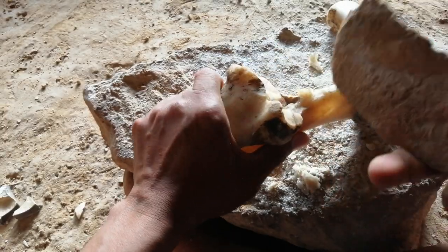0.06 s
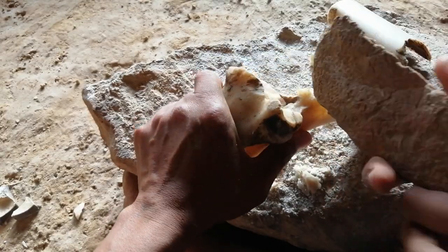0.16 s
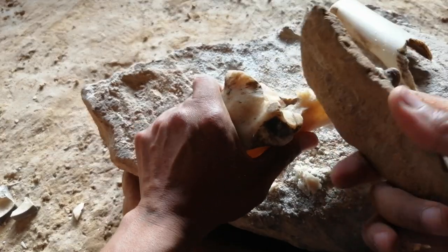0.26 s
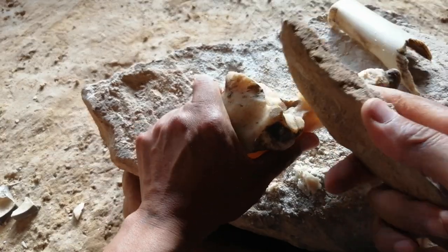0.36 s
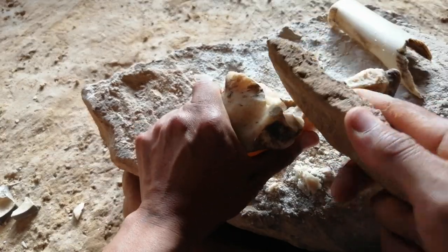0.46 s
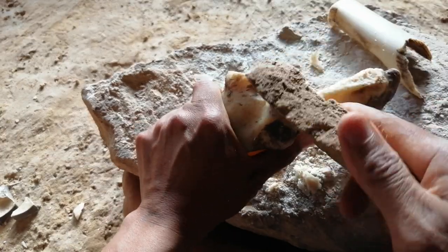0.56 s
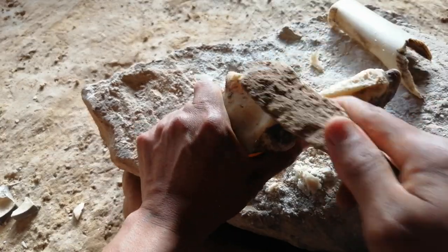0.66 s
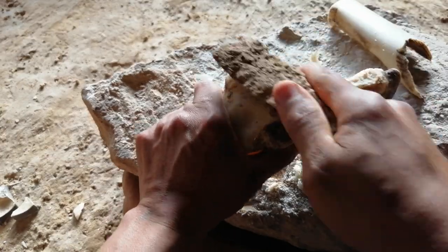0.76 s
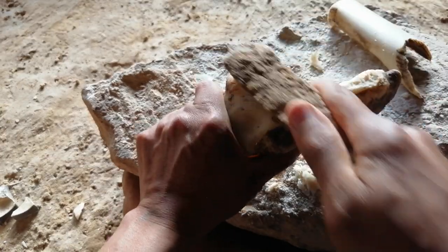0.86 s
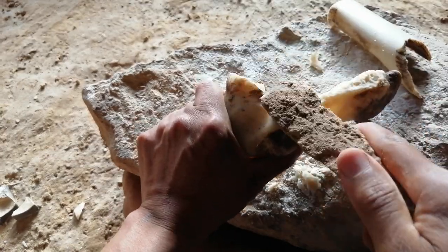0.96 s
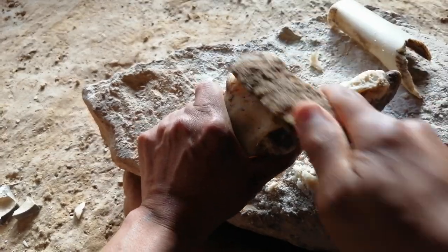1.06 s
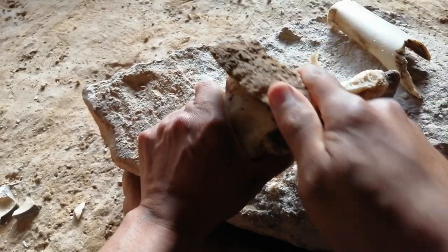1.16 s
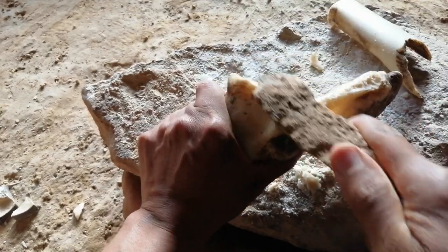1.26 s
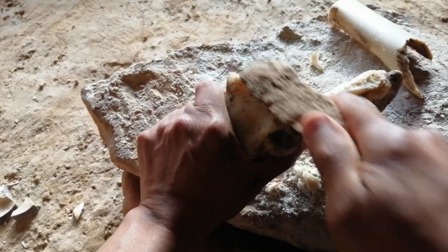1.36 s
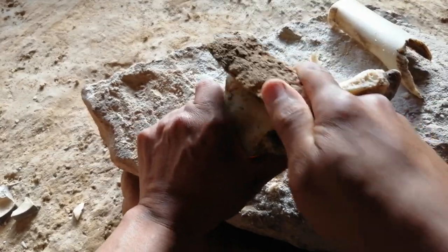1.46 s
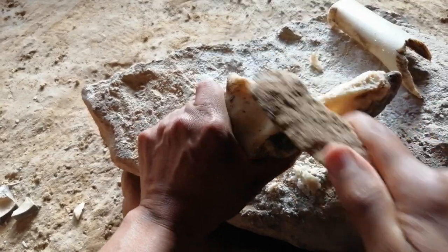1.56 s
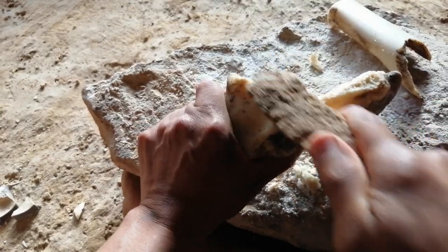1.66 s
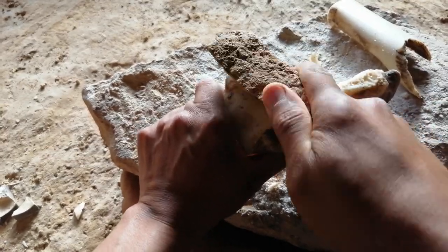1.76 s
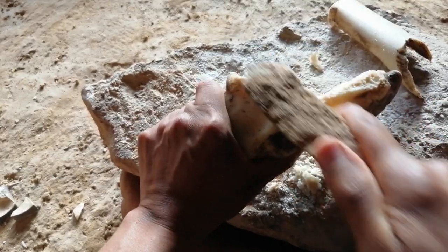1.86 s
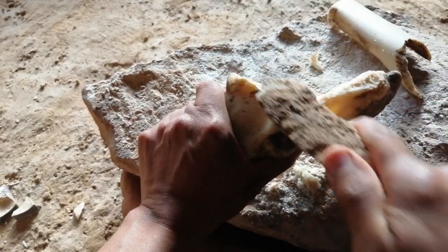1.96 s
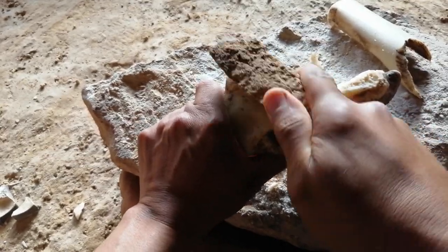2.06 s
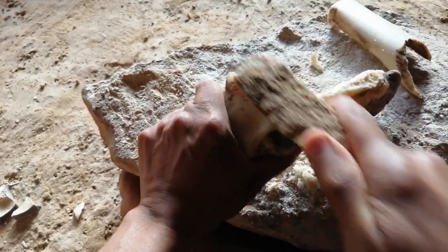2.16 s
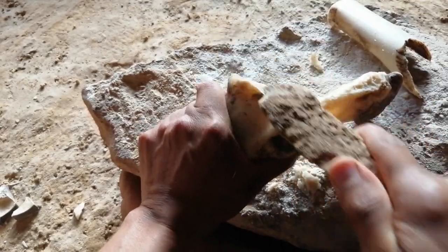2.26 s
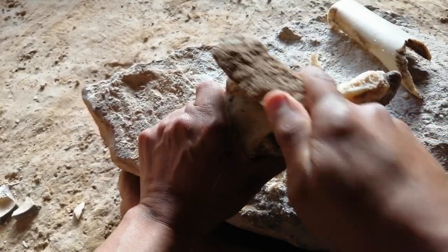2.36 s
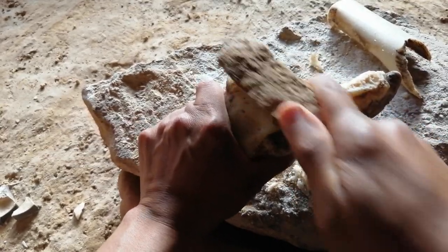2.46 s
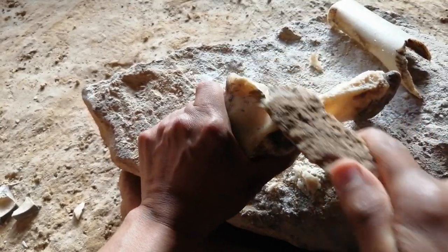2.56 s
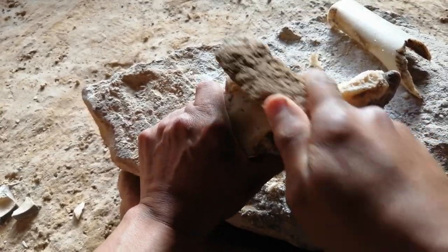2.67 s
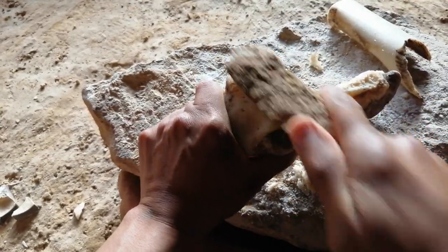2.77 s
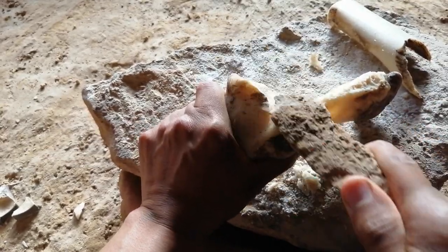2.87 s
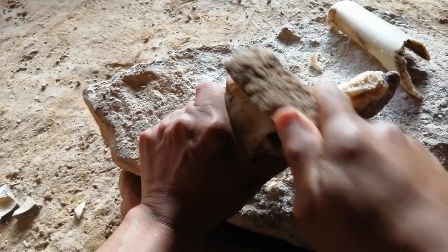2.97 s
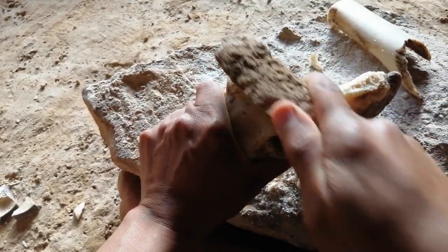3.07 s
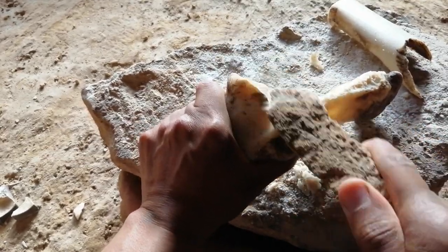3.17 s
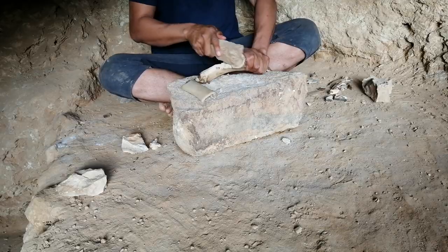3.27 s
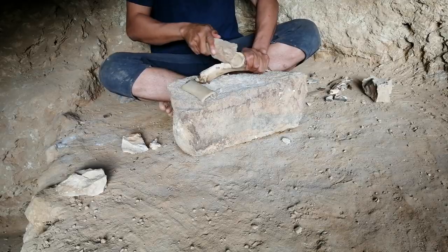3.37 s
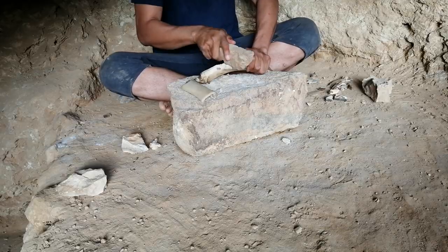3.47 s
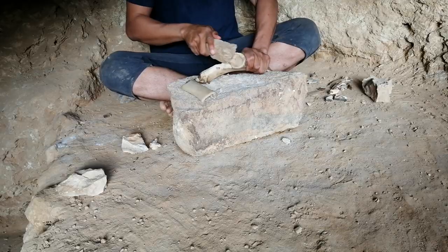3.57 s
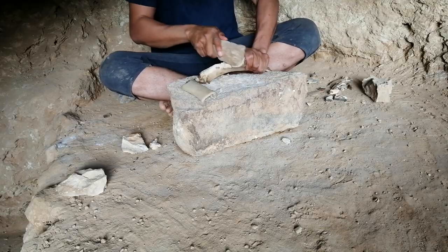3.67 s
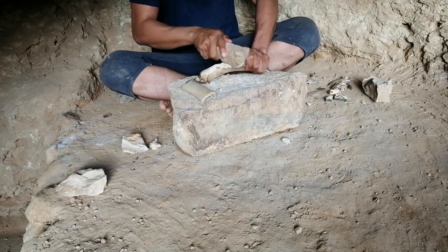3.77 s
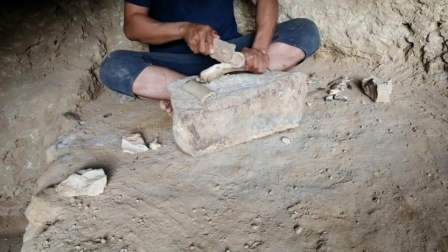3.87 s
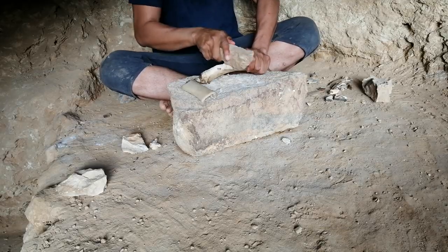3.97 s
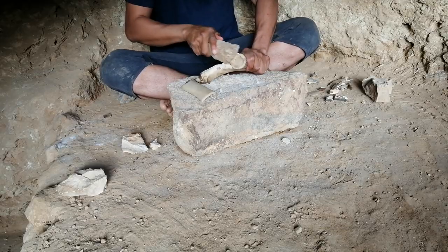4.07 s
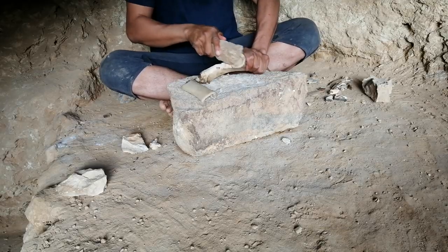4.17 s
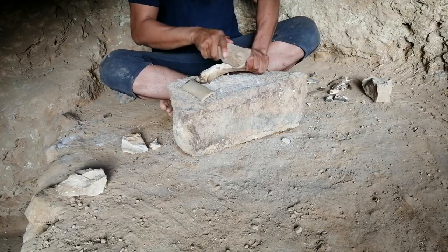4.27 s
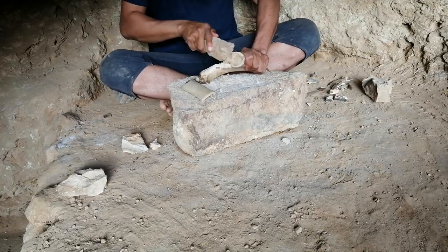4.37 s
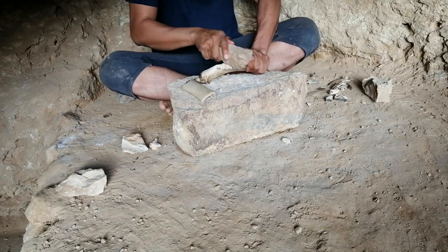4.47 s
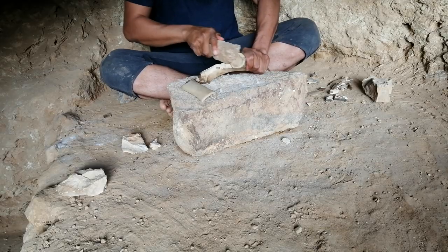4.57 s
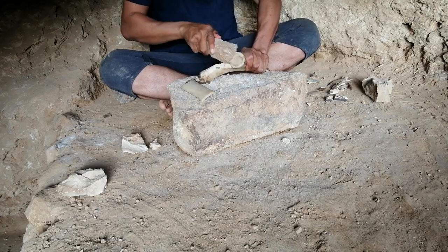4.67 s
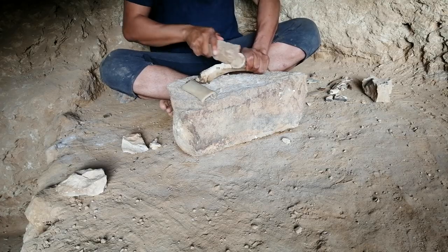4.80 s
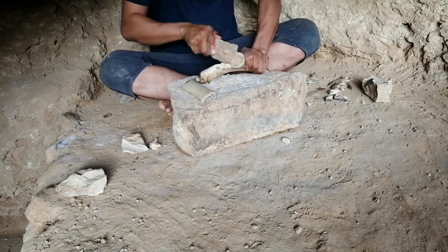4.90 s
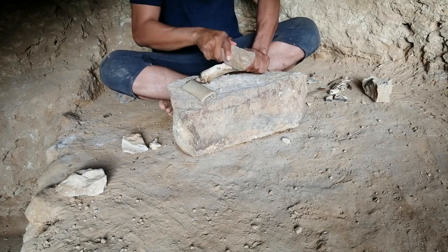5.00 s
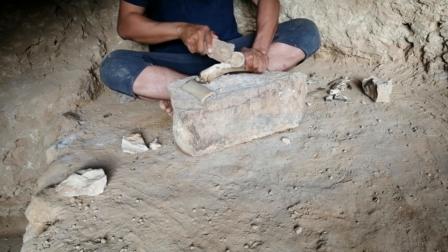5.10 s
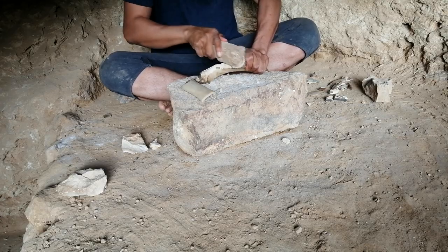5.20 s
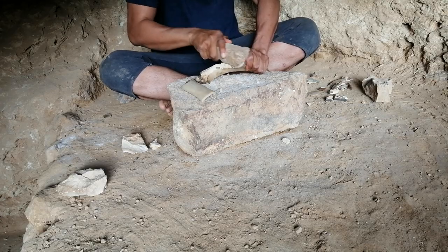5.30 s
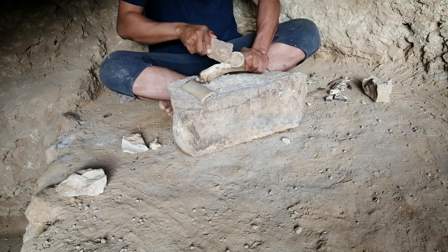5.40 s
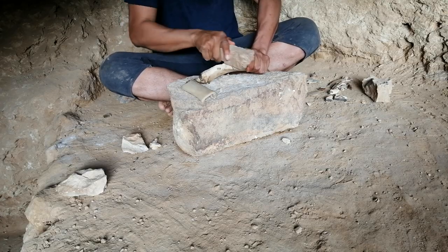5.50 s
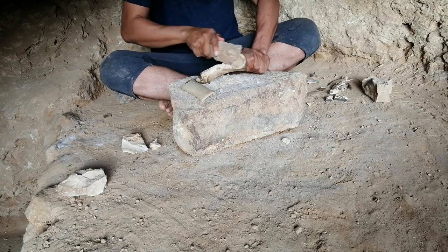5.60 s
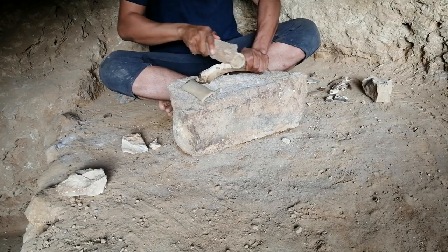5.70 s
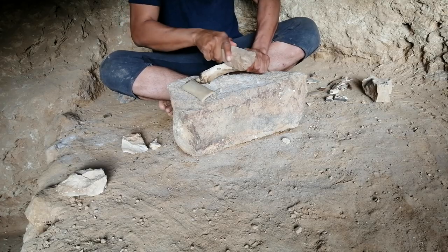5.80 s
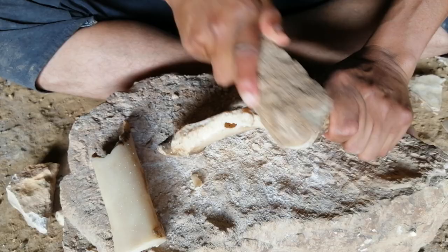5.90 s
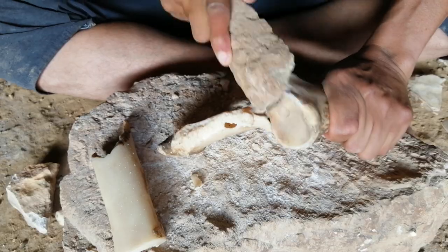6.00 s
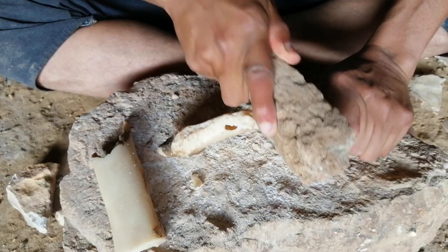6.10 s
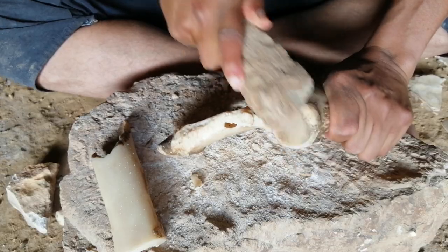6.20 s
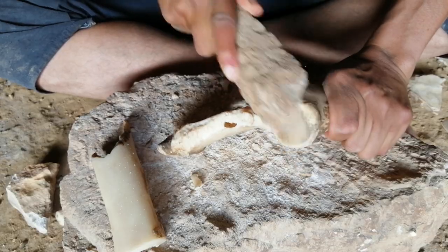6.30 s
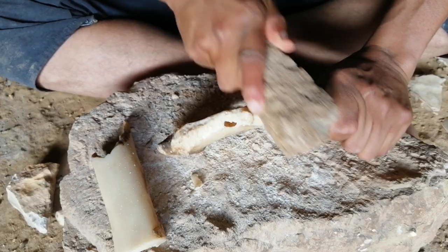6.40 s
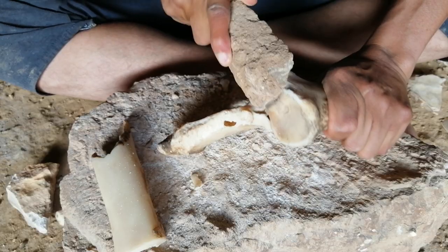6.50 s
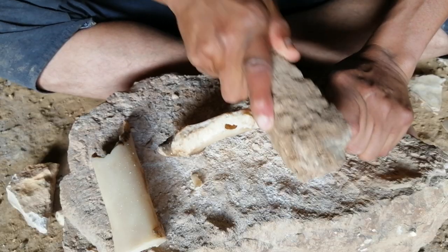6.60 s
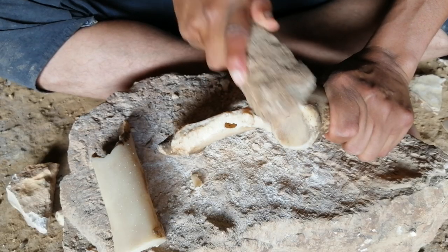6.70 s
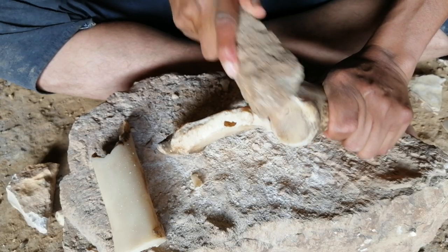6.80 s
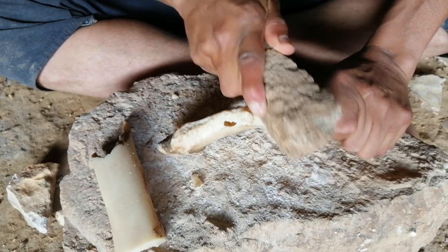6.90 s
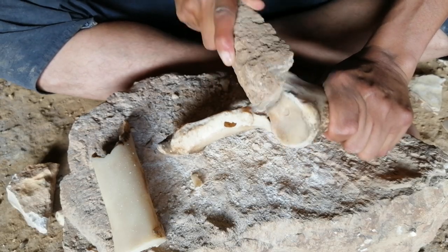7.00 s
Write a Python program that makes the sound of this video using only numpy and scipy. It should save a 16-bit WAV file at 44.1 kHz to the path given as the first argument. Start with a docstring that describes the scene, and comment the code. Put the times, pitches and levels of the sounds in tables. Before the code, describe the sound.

Handcraft grinding in a sheltered earthen place: coarse stone on a bone knuckle, resting on a heavy rock slab. It starts hesitantly, then settles into a steady fast back-and-forth rasp with dull slab shudder beneath. Midway the view jumps back and the strokes turn louder and more clipped with wind rumble on the microphone; near the end it jumps close again, quieter and cleaner, the wind gone.

```python
"""Two faint whistled notes come first, in still air with an uneven draught on the microphone; then work starts haltingly.
A rough stone rubs the knuckle of a bone on a rock slab, soon about seven strokes a second; one soft bump comes early,
with a lower, weaker tail. Random grain forces drive resonances: coarse grit rasps, fine grit hisses. Knocks are damped
sines, splinters noise bursts; each stroke makes the slab shudder: filtered noise that lingers into the turn.
Heard over the hands, from 3.3 s across the earth floor, from 5.94 s close in front; push and pull alternate in each."""
import sys
import numpy as np
from scipy import signal
from scipy.fft import rfft, irfft
from scipy.io import wavfile
from scipy.ndimage import uniform_filter1d

SR = 44100
rng = np.random.default_rng(int(sys.argv[2]) if len(sys.argv) > 2 else 0)


def unload_wav(signal):
    """Save mono or channel-first audio to the path in sys.argv[1] as 16-bit WAV at rate SR, clipped to [-1, 1]."""
    wavfile.write(
        sys.argv[1],
        SR,
        np.round(np.clip(np.atleast_2d(signal).T, -1, 1) * 32767).astype(np.int16),
    )


N = 310905

# Strokes, push and pull alternating, beginning again with a push at each listening place.
# Each row: full contact from and until in seconds, rise time in seconds,
# rasp and hiss in dB before the colour and trim of the place.
STROKES = [(0.337, 0.388, .025, -48, -45.5), (0.865, 0.933, 0.058, -38, -39),
           (1.044, 1.109, 0.096, -37.5, -33.5), (1.186, 1.279, 0.034, -35.5, -36),
           (1.371, 1.427, 0.043, -35, -33), (1.499, 1.598, 0.0099, -37, -38),
           (1.661, 1.746, .018, -34, -34), (1.815, 1.908, 0.015, -35, -36), (1.969, 2.058, 0.027, -34, -36),
           (2.126, 2.211, 0.02, -35, -35.5), (2.287, 2.363, 0.031, -34, -35.5),
           (2.442, 2.529, 0.01, -33, -37.7), (2.609, 2.702, 0.042, -33, -35.5),
           (2.757, 2.854, 0.0076, -34.5, -35.5), (2.932, 3.021, 0.048, -32, -34.5),
           (3.075, 3.17, 0.0081, -32.5, -34), (3.247, 3.332, 0.037, -35.5, -37),
           (3.405, 3.465, 0.031, -34.5, -34), (3.54, 3.602, 0.027, -33, -36.5),
           (3.693, 3.728, 0.046, -28.5, -33), (3.796, 3.859, 0.01, -33, -36),
           (3.951, 3.976, 0.058, -27.5, -31), (4.052, 4.107, 0.013, -32.5, -35.5),
           (4.187, 4.229, 0.036, -29, -31), (4.312, 4.36, 0.023, -29.5, -35),
           (4.449, 4.476, 0.054, -28.5, -33), (4.559, 4.608, 0.013, -30, -34),
           (4.688, 4.737, 0.073, -30.5, -33.5), (4.818, 4.87, .016, -30.5, -33),
           (4.952, 4.993, 0.037, -28.5, -34.5), (5.079, 5.136, 0.026, -29, -35.5),
           (5.21, 5.261, .024, -29.3, -33.5), (5.351, 5.407, 0.026, -27, -35.5),
           (5.483, 5.525, 0.024, -28.5, -34), (5.603, 5.668, .015, -30, -35.5),
           (5.742, 5.79, 0.02, -28.5, -35), (5.874, 5.915, 0.016, -30, -34),
           (5.95, 5.969, 0.0072, -37.5, -42.5), (6.023, 6.111, 0.004, -36, -40),
           (6.168, 6.237, 0.011, -32.5, -40), (6.304, 6.391, 0.018, -35, -40.5),
           (6.441, 6.5, 0.022, -35, -40.5), (6.58, 6.646, 0.029, -36.5, -41.5),
           (6.703, 6.776, .013, -34, -41), (6.839, 6.896, .021, -34, -39.5),
           (6.977, 7.036, 0.047, -33, -38)]
# Hard knocks on a ridge. Each row: time in seconds, relative peak in dB, pitch in Hz.
KNOCKS = [(0.3399, -35, 2000), (0.3753, -32, 1640), (0.7277, -23.5, 1230), (0.731, -21.5, 980),
          (1.0857, -19, 1000), (1.19, -22, 1170), (1.22, -17.5, 1140), (1.266, -16.5, 1630),
          (1.343, -25.5, 1250), (1.5098, -20.5, 1070), (1.524, -16, 1190), (1.6046, -19, 1130),
          (1.6628, -21.3, 1000), (1.668, -20.5, 1070), (1.8294, -19.5, 1430), (1.8623, -19, 1330),
          (1.995, -20, 1020), (2.116, -27, 1270), (2.1403, -17.5, 1060), (2.2032, -22.5, 1120),
          (2.288, -19, 1130), (2.4545, -14.5, 1240), (2.5155, -14, 1270), (2.6064, -21, 1000),
          (2.7788, -17, 1210), (2.8437, -17.5, 1200), (2.904, -32, 1090), (2.938, -22, 1110),
          (3.1049, -16, 1240), (3.1708, -16, 1170), (3.2246, -23.5, 1140), (3.863, -23, 1080),
          (4.1102, -18.5, 1000), (4.471, -13, 1630), (4.5636, -12.5, 1450), (4.685, -17.5, 1240),
          (4.816, -7, 1750), (4.9364, -30, 1950), (5.3417, -20, 1120), (5.4001, -21, 940),
          (5.917, -12.5, 1580), (6.024, -32, 1710), (6.1043, -22, 1260), (6.342, -21, 1360),
          (6.7521, -16, 1090)]
# Large splinters chip off. Each row: time in seconds, relative level in dB.
CHIPS = [(.3381, -39.5), (.385, -50), (0.7284, -33), (0.8598, -25), (1.496, -32), (1.5316, -24.5),
         (1.5827, -25.5), (1.724, -25.5), (1.8141, -27), (1.997, -24), (3.0206, -38), (4.1126, -20.5),
         (4.343, -22.5), (4.4484, -24), (5.0476, -30), (5.4923, -26), (6.1725, -27.5), (6.3662, -27),
         (6.5932, -22.5), (6.712, -25), (6.846, -25.5), (6.855, -23.5)]
# Soft bump against the slab and its low tail. Each row: time in seconds, level in dB, pitch in Hz, t60 in seconds.
BUMP = [(0.39, -36, 122, 0.097), (.43, -45.5, 85, .2)]
# Broad colour of bone, stone and slab from above. Each row: frequency in Hz, relative gain in dB.
ABOVE_SLOPE = [(90, -9), (150, -1.3), (230, -9.5), (500, 1.5), (1000, 0.35), (1600, -8.5), (3000, -13),
               (6000, -20.5), (10000, -25), (15600, -27)]
# Peaks and hollows from above. Each row: frequency in Hz, width in Hz, left and right gain in dB.
ABOVE_MODES = [(293, 190, 10.5, 8), (427, 112, -12.5, -3), (740, 42, -2, -21.5), (1130, 740, 1.5, -5.5),
               (1370, 270, -2, 5.5), (1925, 75, -1.5, -7), (2235, 130, 9.5, 6), (2770, 450, 10, 8),
               (2950, 220, -6.5, -20), (3390, 260, 2.5, 3), (4660, 800, 4.5, 2.1), (6140, 340, 11, 3.5),
               (6920, 260, -2.1, 3.5), (8900, 790, 3.5, 5.5), (10370, 460, 8, 2), (13100, 4100, -0.5, -3)]
# Broad colour from across the floor. Each row: frequency in Hz, relative gain in dB.
ACROSS_SLOPE = [(90, -15.5), (150, 0), (230, -13), (500, 2), (1000, -7), (1600, -9), (3000, -10.5),
                (6000, -13), (10000, -27), (15600, -30.5)]
# Peaks and hollows from across. Each row: frequency in Hz, width in Hz, left and right gain in dB.
ACROSS_MODES = [(314, 88, 6, -0.5), (405, 41, -1.5, -1.5), (511, 60, 3, 6), (690, 14, -13, -3.5),
                (943, 130, 4.5, 6.5), (1417, 39, -8, -18), (1470, 50, 4.5, 16.5), (1500, 62, -3, -18),
                (2070, 490, 6.5, 6), (2560, 120, -4, -2.5), (3320, 600, -1, 4.5), (3950, 170, 12, 2),
                (4240, 160, -6, -3), (4510, 210, 8, 3.5), (8660, 435, -1, 4), (10600, 2200, 2, 4.5)]
# Broad colour from in front. Each row: frequency in Hz, relative gain in dB.
FRONT_SLOPE = [(90, 6.5), (150, -1.5), (230, -2), (500, -2), (1000, -3), (1600, -4), (3000, -5.5),
               (6000, -8), (10000, -15.5), (15600, -18.5)]
# Peaks and hollows from in front. Each row: frequency in Hz, width in Hz, left and right gain in dB.
FRONT_MODES = [(270, 52, -4.5, -2), (480, 100, -4.5, 2.5), (616, 88, 7.5, 6), (764, 125, 7.5, 4.5),
               (915, 120, -0.5, 2.5), (1400, 61, -6, 0), (1845, 100, -14, -2.5), (2000, 220, 6.5, 1.5),
               (2520, 310, -4, -6), (3060, 730, -7.5, 0.5), (4270, 92, -4, -4), (4970, 300, 1, 6.5),
               (5851, 180, -5, 9), (6830, 340, 8.5, 4.5), (8600, 580, 2, 4), (12600, 950, 3, 5)]
# Listening place goes from above to across, then to in front. Entries: times in seconds.
MOVES_S = (3.3, 5.94)
# Colour of the two microphone ports. Each row: frequency in Hz, left and right gain in dB.
PORTS = [(100, -4.5, -0.4), (1000, -0.84, 1.8), (2240, -0.5, 0.4), (3390, 4, 2.5), (3800, -17.5, -4.5),
         (4770, -1, 3.5), (5260, -3, 11), (6150, -9, -2.5), (6730, 2.5, 3.5), (9050, 6, -6),
         (10400, -2.5, -2), (11800, -3.5, -3.5), (15000, -5.5, 6.5), (15800, -12, 0)]
# Likeness of the ports, limited to +-0.98 in use. Each row: frequency in Hz, left-right correlation (no unit).
LIKENESS = [(150, 0.99), (550, 1), (1100, 0.7), (2000, 0.41), (3200, 0.072), (6000, -0.062),
            (15000, -0.093)]
# Slab shudder above, across and in front. Each row: steady level of a firm stroke in dB, t60 in seconds.
SHUDDER = [(-41, 0.18), (-46.5, 0.48), (-53.5, 0.65)]
# Colour of the shudder. Each row: frequency in Hz, relative gain in dB.
SHUDDER_COLOUR = [(30, -66), (60, -12), (90, 1.5), (140, 4), (190, -0.5), (280, -22), (800, -35)]
# Strength of the draught. Each row: time in seconds, relative level in dB.
DRAUGHT = [(0, -68), (.3, -70), (1.05, -65), (1.25, -59), (1.6, -66), (2.55, -59), (3.18, -65),
           (3.31, -37.5), (3.5, -44.5), (4.05, -44.5), (4.35, -46), (4.62, -41), (5.25, -61), (5.45, -47),
           (5.9, -43), (5.99, -69), (6.87, -79), (7.05, -60)]
# Colour of the draught. Each row: frequency in Hz, relative gain in dB.
DRAUGHT_COLOUR = [(12, -6), (25, -4.5), (45, -9), (70, -4), (120, -29.5), (250, -20), (800, -62)]
# Colour of still air. Each row: frequency in Hz, relative gain in dB.
AIR_COLOUR = [(24, -18.5), (40, -13.5), (60, -22), (71, -11), (461, -28.5), (1640, -37.5), (2840, -36),
              (3930, -42), (5440, -34.5), (7160, -42.5), (15500, -46)]
# Grit and slip above, across and in front. Each row: spread of coarse and of fine grains in dB, judder in dB.
TEXTURE = [(1.5, 4, 2.5), (3, 1, 2), (3, 5.5, 3.5)]
# Faint high whistle. Each row: middle in seconds, half length in seconds, pitch in Hz, level in dB.
WHISTLES = [(.168, .016, 4860, -61), (0.202, .012, 4850, -62)]
# Push above, across and in front. Each row: fall time in seconds, easing of pressure in dB, harshness in dB.
PUSH = [(.036, 3.5, -3.5), (.047, .5, -3), (.038, 1, 1)]
# Pull above, across and in front. Each row: fall time in seconds, easing of pressure in dB, harshness in dB.
PULL = [(.038, 0.18, -0.96), (.042, -2, -1.2), (.042, 2, 1.8)]
# Small ridge met in each stroke, above, across and in front. Entries: centre of knock over rasp in dB.
RIDGE_OVER_RASP_DB = [11.5, -2, 7]

RIDGE_HZ, RIDGE_SPREAD_OCTAVES = 1130, 0.27
AIR_DB = -68.5
CUTOFF_HZ, GRIT_SPLIT_HZ = 15950, 3000
EDGE_DB = 25.5  # loss over one rise or fall time
SHUDDER_FOLLOWS = 0.3  # share of a stroke's dB that the shudder follows
FIRM_RASP_DB = -32.5
TIME_S = np.arange(N) / SR
HZ = np.maximum(np.fft.rfftfreq(8192, 1 / SR), 1)


def from_db(db):
    """Decibels to gain."""
    return 10 ** (np.asarray(db) / 20)


def rms_one(x):
    """Scale to rms 1."""
    return x / np.sqrt(np.mean(x ** 2) + 1e-20)


def in_time(rows):
    """Level curve at every sample."""
    return np.interp(TIME_S, *np.transpose(rows))


def over_hz(points, axis=1):
    """One column of a spectrum table on the frequency grid, linear in log frequency."""
    points = np.array(points)
    return np.interp(np.log(HZ), np.log(points[:, 0]), points[:, axis])


def colour(x, gain):
    """Causal (minimum-phase) filter with the given gain, made by folding the cepstrum."""
    cepstrum = irfft(np.log(np.atleast_2d(gain) + 1e-6))
    half = len(HZ) - 1
    cepstrum[:, 1:half] *= 2
    cepstrum[:, half + 1:] = 0
    response = irfft(np.exp(rfft(cepstrum)))[:, :half]
    return signal.fftconvolve(np.atleast_2d(x), response, axes=1)[:, :N]


def drift(rate_hz):
    """Smooth random curve of rms 1: noise through two equal one-pole low-passes."""
    r = np.exp(-2 * np.pi * rate_hz / SR)
    settled = signal.lfilter([1], [1, -2 * r, r * r], rng.standard_normal(N + SR))[SR:]
    return rms_one(settled)


def add(track, start_s, sound):
    """Mix a short sound in at its start time."""
    start = max(round(start_s * SR), 0)
    track[..., start:start + sound.shape[-1]] += sound[..., :N - start]


def ping(hz, t60_s):
    """A struck mode: sine of initial height 1 that dies exponentially."""
    t = TIME_S[:SR // 4]
    return np.sin(2 * np.pi * hz * t) * from_db(-60 * t / t60_s)


def noise(spectrum, side_db):
    """Coloured stereo noise with a mid of rms 1."""
    mid, side = rms_one(colour(rng.standard_normal((2, N)), from_db(over_hz(spectrum))))
    return mid + from_db(side_db) * side * np.array([[1], [-1]])


def place():
    """Listening place at every sample: 0 above, 1 across, 2 in front."""
    return np.searchsorted(MOVES_S, TIME_S)


def still_air():
    """Steady quiet noise of the air."""
    return from_db(AIR_DB) * noise(AIR_COLOUR, side_db=-1)


def thin_whistle(waver_hz):
    """Two short high sines of slightly wavering pitch."""
    out = np.zeros(N)
    for middle_s, half_s, hz, level_db in WHISTLES:
        phase = 2 * np.pi * np.cumsum(hz + waver_hz * drift(rate_hz=60)) / SR
        swell = np.exp(-((TIME_S - middle_s) / half_s) ** 4)
        out += from_db(level_db) * swell * np.sin(phase)
    return out


def draught(lean_db, gust_db, level_db):
    """Low noise in uneven puffs; across the floor it buffets mostly the right port."""
    lean = from_db((place() == 1) * np.array([[-lean_db], [3.5]]))
    puffs_db = gust_db * np.clip(drift(rate_hz=16.5), -2, 2)
    strength = from_db(in_time(DRAUGHT) + puffs_db + level_db)
    return strength * lean * noise(DRAUGHT_COLOUR, side_db=-2.5)


def motion():
    """Each stroke speeds up, holds and dies. Gives samples, progress, effort, rasp, hiss, harshness."""
    places = np.searchsorted(MOVES_S, [row[0] for row in STROKES])
    for k, (start_s, end_s, rise_s, rasp_db, hiss_db) in enumerate(STROKES):
        turn = np.count_nonzero(places[:k] == places[k])
        manner = PULL if turn % 2 else PUSH
        fall_s, easing_db, harsh_db = manner[places[k]]
        near = slice(max(int((start_s - 4 * rise_s) * SR), 0), int((end_s + 4 * fall_s) * SR))
        t = TIME_S[near]
        along = np.clip((t - start_s) / (end_s - start_s), 0, 1)
        slowing = np.maximum(start_s - t, 0) / rise_s + np.maximum(t - end_s, 0) / fall_s
        effort_db = -EDGE_DB * slowing - easing_db * (along - .5)
        yield near, along, effort_db, rasp_db, hiss_db, harsh_db


def slab():
    """Strokes feed a dull shudder of the heavy rock that lingers; the bump and its tail are added."""
    load = np.zeros(N)
    for near, along, effort_db, rasp_db, hiss_db, harsh_db in motion():
        load[near] += from_db(effort_db + SHUDDER_FOLLOWS * (rasp_db - FIRM_RASP_DB))
    swell, where = 0, place()
    for k, (level_db, t60_s) in enumerate(SHUDDER):
        kept = from_db(-60 / (t60_s * SR))
        lingering = signal.lfilter([1 - kept], [1, -kept], load)
        swell = swell + from_db(level_db) * lingering * (where == k)
    out = swell * noise(SHUDDER_COLOUR, side_db=-16)
    for s, level_db, hz, t60_s in BUMP:
        add(out, s, from_db(level_db) * ping(hz, t60_s))
    return out


def shelter(x, t60_s, wall_hz):
    """Earth floor and rock walls scatter a short, dull tail of decaying noise."""
    t = TIME_S[:SR // 2]
    tail = rng.standard_normal((2, len(t))) * from_db(-60 * t / t60_s) * (t > .004)
    tail /= np.sqrt(np.sum(tail ** 2, axis=1, keepdims=True))
    scattered = signal.fftconvolve(x, tail, axes=1)[:, :N]
    return colour(scattered, 1 / np.sqrt(1 + (HZ / wall_hz) ** 4))


def chips(t60_s, level_db):
    """A splinter crumbles off in a short burst of decaying noise."""
    force, t = np.zeros((2, N)), TIME_S[:SR // 20]
    for s, chip_db in CHIPS:
        decay = from_db(chip_db + level_db - 60 * t / t60_s)
        add(force, s, decay * rng.standard_normal((2, len(t))))
    return force


def small_ridges(spread_db):
    """One light knock at a random point of every stroke, in rows like those of KNOCKS."""
    rows = []
    chances = rng.random((len(STROKES), 3))
    for (start_s, end_s, rise_s, rasp_db, hiss_db), (when, size, pitch) in zip(STROKES, chances):
        over_rasp_db = RIDGE_OVER_RASP_DB[np.searchsorted(MOVES_S, start_s)]
        peak_db = rasp_db + over_rasp_db + spread_db * (2 * size - 1)
        hz = RIDGE_HZ * 2 ** (RIDGE_SPREAD_OCTAVES * (2 * pitch - 1))
        rows.append((start_s + when * (end_s - start_s), peak_db, hz))
    return rows


def knocks(t60_s, level_db, crack_db, crack_t60_s, side_share):
    """The hand damps each knock within a few cycles; crushed grit adds a dry crack."""
    force, t = np.zeros((2, N)), TIME_S[:SR // 4]
    for s, peak_db, hz in KNOCKS + small_ridges(spread_db=6.5):
        crack = from_db(crack_db - 60 * t / crack_t60_s) * rng.standard_normal((2, len(t)))
        mid_side = np.array([[1], [side_share * rng.choice([-1, 1])]])
        blow = ping(hz, t60_s) * mid_side
        add(force, s, from_db(peak_db + level_db) * (blow + crack))
    return force


def contact(lift_db, lead_s, length_s):
    """The stone skips off the bone for an instant before each hard knock: the grit force dips."""
    lifted, t = np.zeros(N), np.arange(-SR // 20, SR // 20) / SR
    for s, peak_db, hz in KNOCKS:
        add(lifted, s + t[0], np.exp(-((t + lead_s) / length_s) ** 2))
    return from_db(-lift_db * np.minimum(lifted, 1))


def grit(per_s, spread_db, grip_db):
    """Grains catch and let go at random, a few of them large; rows are the mid and side force."""
    caught = rng.random(N) < per_s / SR
    sizes = from_db(spread_db * np.minimum(rng.exponential(1, N), 4) + grip_db)
    force = caught * sizes
    # the hand keeps the mean load steady
    load = np.sqrt(np.maximum(uniform_filter1d(force ** 2, SR // 20), 1e-9))
    return force / load * rng.choice([-1, 1], (2, N))


def snaps(per_s, above_hz, level_db):
    """Single hard grains crack at random with a very bright tick."""
    ticks = (rng.random(N) < per_s / SR) * from_db(6.7 * np.minimum(rng.exponential(1, N), 3))
    bright = 1 / np.sqrt(1 + (above_hz / HZ) ** 6)
    return from_db(level_db) * colour(rms_one(ticks) * rng.choice([-1, 1], (2, N)), bright)


def contact_spot(spot_db, count=130):
    """Each spot on the bone favours some modes and misses others: random dB, mid and side."""
    mode_hz = np.geomspace(250, 16000, count)
    weights = np.clip(rng.standard_normal((2, count)), -2, 2)
    return spot_db * np.array([np.interp(HZ, mode_hz, row) for row in weights])


def strokes(coarse, fine, hiss_steepness, spot_db, harsh_hz, harsh_width_hz,
            firm_hiss_db=-36, top_slope=1.0, top_hz=10500):
    """The effort of each stroke drives rasp and hiss; the hiss follows it more steeply."""
    rasp, hiss = np.zeros((2, 2, N))
    for near, along, effort_db, rasp_db, hiss_db, harsh_db in motion():
        # a sharper edge of the stone makes the stroke harsher
        tone_db = harsh_db * np.exp(-((HZ - harsh_hz) / harsh_width_hz) ** 2)
        # a firmer stroke crushes more of the finest grit, which gives the very top
        tone_db = tone_db + top_slope * (hiss_db - firm_hiss_db) / (1 + (top_hz / HZ) ** 6)
        rasp_gain = from_db(rasp_db + effort_db)
        hiss_gain = from_db(hiss_db + hiss_steepness * effort_db)
        # the contact slides from one spot on the bone to another
        for share in (1 - along, along):
            tone = from_db(tone_db + contact_spot(spot_db))
            add(rasp, near.start / SR, colour(share * coarse[:, near] * rasp_gain, tone))
            add(hiss, near.start / SR, colour(share * fine[:, near] * hiss_gain, tone))
    return rasp, hiss


def body(coarse, fine, blows, slope, modes, rasp_db, hiss_db):
    """Coarse grit and blows drive the low resonances, fine grit the high ones; the two ports differ."""
    db = over_hz(slope) + np.array([over_hz(PORTS, axis=1), over_hz(PORTS, axis=2)])
    for hz, width_hz, left_db, right_db in modes:
        db = db + np.array([[left_db], [right_db]]) / (1 + (2 * (HZ - hz) / width_hz) ** 2)
    gain = from_db(db) / np.sqrt(1 + (130 / HZ) ** 4) * (HZ < 17000)
    low_share = 1 / (1 + (HZ / GRIT_SPLIT_HZ) ** 8)
    low = rms_one(gain * np.sqrt(low_share))
    high = rms_one(gain * np.sqrt(1 - low_share))
    alike = np.clip(over_hz(LIKENESS), -.98, .98)
    mid_side_gain = np.sqrt([(1 + alike) / 2, (1 - alike) / 2])
    low_force = coarse * from_db(rasp_db) + blows / low.max()
    high_force = fine * from_db(hiss_db)
    out = 0
    for force, response in ((low_force, low), (high_force, high)):
        mid, side = colour(force, mid_side_gain)
        out = out + colour(np.array([mid + side, mid - side]), response)
    return out


def grinding():
    """The stone judders as it slides, so coarse and fine grit come in shared clumps."""
    where = place()
    coarse_db, fine_db, judder_db = np.array(TEXTURE)[where].T
    grip_db = judder_db * drift(rate_hz=118)
    fine_grip_db = 0.86 * grip_db + 0.55 * drift(rate_hz=53)
    coarse = grit(per_s=4000, spread_db=coarse_db, grip_db=grip_db)
    fine = grit(per_s=16000, spread_db=fine_db, grip_db=fine_grip_db)
    fine = fine + snaps(per_s=110, above_hz=11000, level_db=-11)
    touching = contact(lift_db=3.5, lead_s=0.0073, length_s=0.0029)
    rasp, hiss = strokes(coarse * touching, fine * touching, hiss_steepness=1.03, spot_db=4.0,
                         harsh_hz=2350, harsh_width_hz=1840)
    blows = knocks(t60_s=0.0079, level_db=9.0, crack_db=-0.5, crack_t60_s=0.009, side_share=0.82)
    forces = np.array([rasp, hiss + chips(t60_s=0.045, level_db=-3.5), blows])
    above = body(*forces * (where == 0), ABOVE_SLOPE, ABOVE_MODES, rasp_db=1.98, hiss_db=0.65)
    across = body(*forces * (where == 1), ACROSS_SLOPE, ACROSS_MODES, rasp_db=-0.6, hiss_db=-0.54)
    front = body(*forces * (where == 2), FRONT_SLOPE, FRONT_MODES, rasp_db=-4.0, hiss_db=0.35)
    scattered = from_db(-8.5) * above + from_db(-8.0) * across + from_db(-8) * front
    return above + across + front + shelter(scattered, t60_s=0.11, wall_hz=6270)


def scene():
    """Air, whistle and draught behind the slab and the grinding on it."""
    background = still_air() + thin_whistle(waver_hz=22) + draught(lean_db=12, gust_db=3.5, level_db=1)
    return background + slab() + grinding()


def record(dry):
    """Steep elliptic low-pass cuts the top."""
    return signal.sosfilt(signal.ellip(12, .1, 80, CUTOFF_HZ, fs=SR, output="sos"), dry)


dry = scene()
out = record(dry)
unload_wav(out)
```